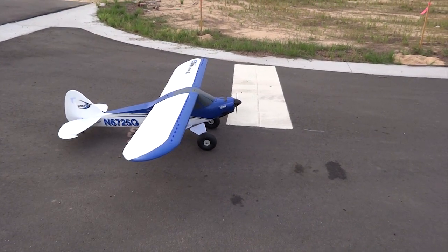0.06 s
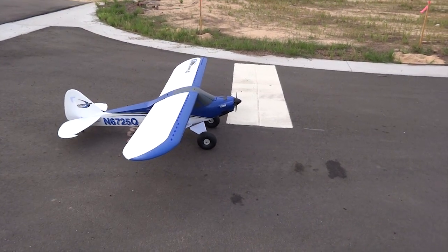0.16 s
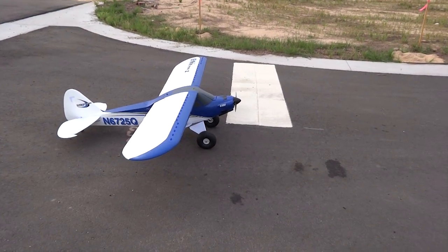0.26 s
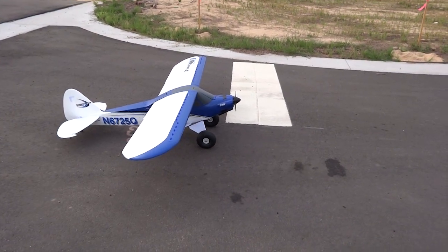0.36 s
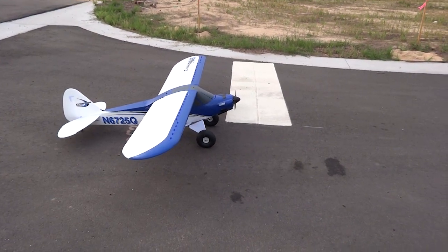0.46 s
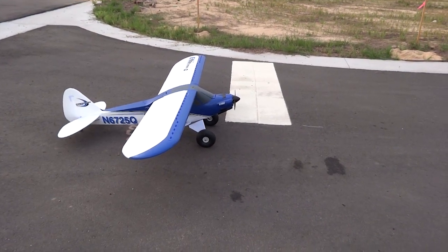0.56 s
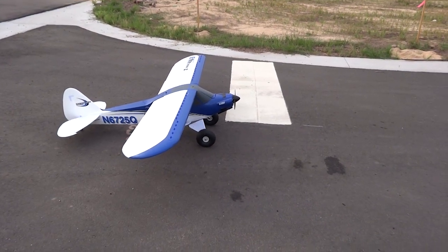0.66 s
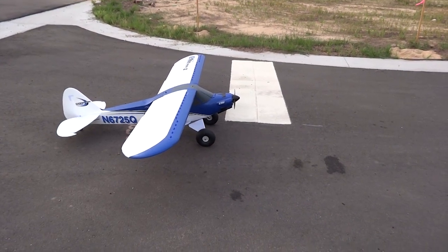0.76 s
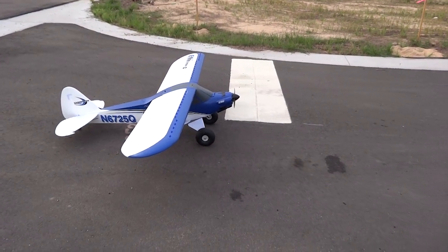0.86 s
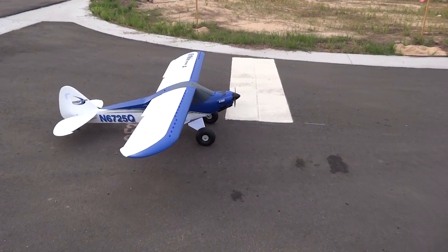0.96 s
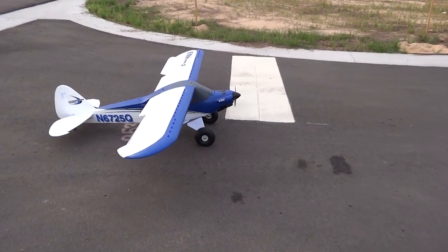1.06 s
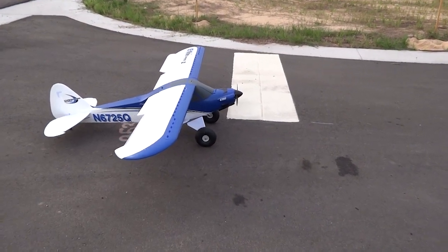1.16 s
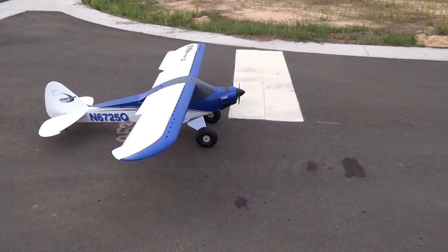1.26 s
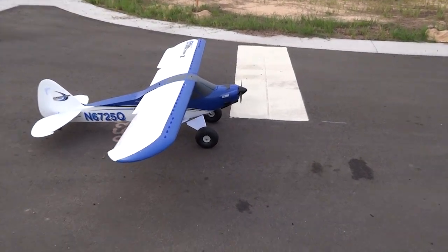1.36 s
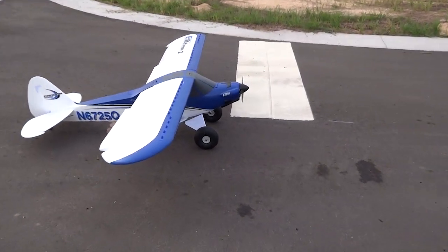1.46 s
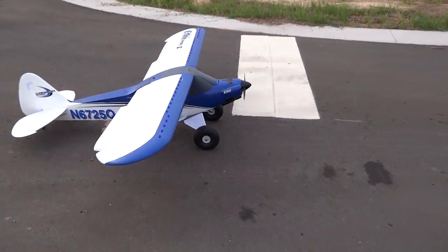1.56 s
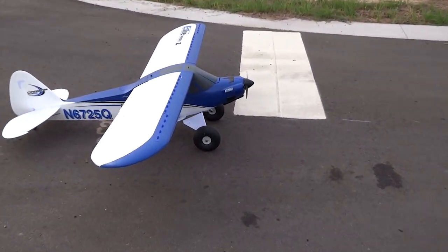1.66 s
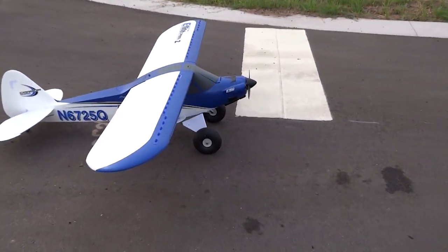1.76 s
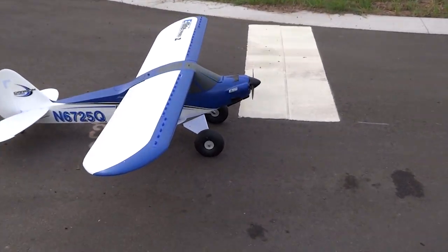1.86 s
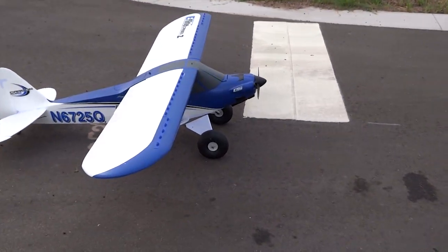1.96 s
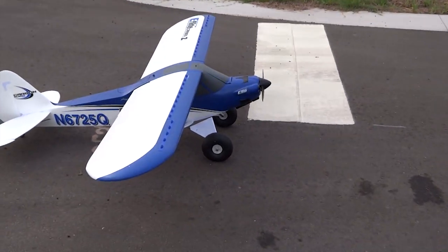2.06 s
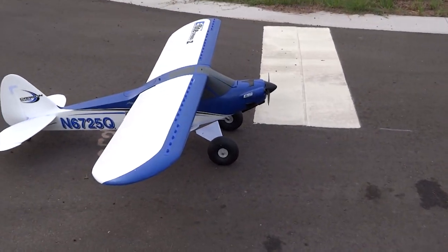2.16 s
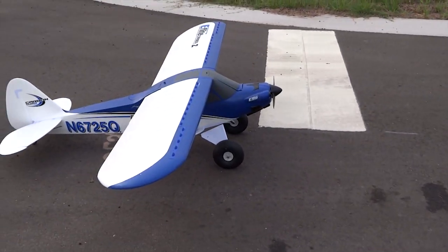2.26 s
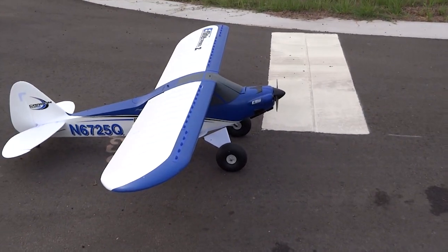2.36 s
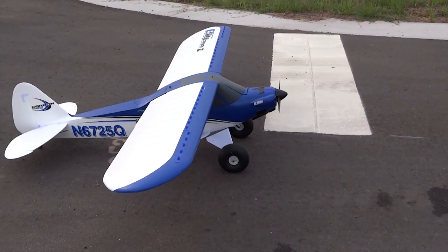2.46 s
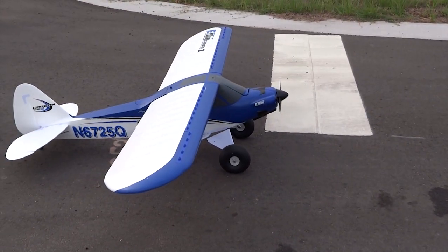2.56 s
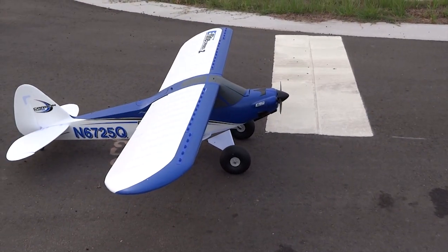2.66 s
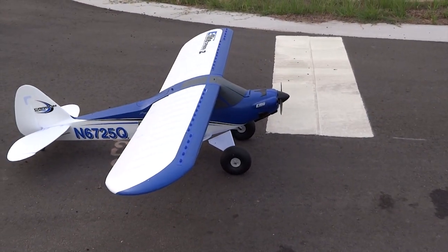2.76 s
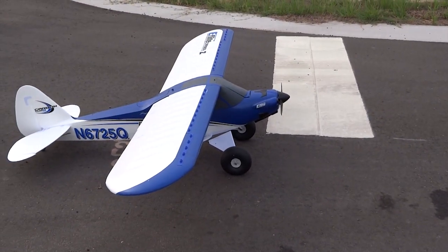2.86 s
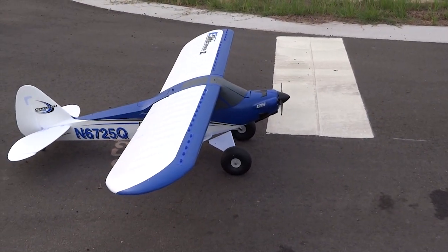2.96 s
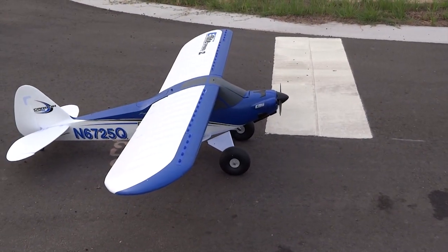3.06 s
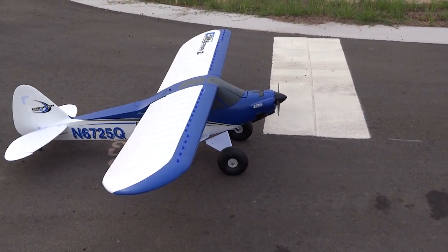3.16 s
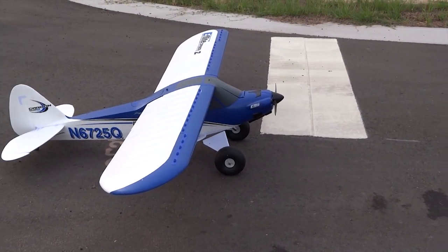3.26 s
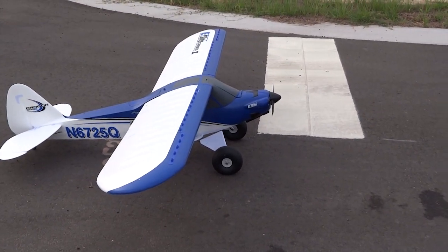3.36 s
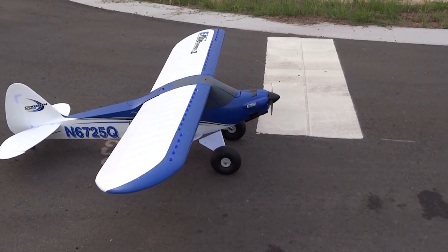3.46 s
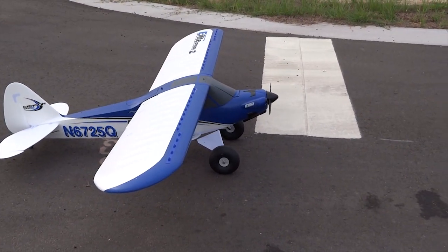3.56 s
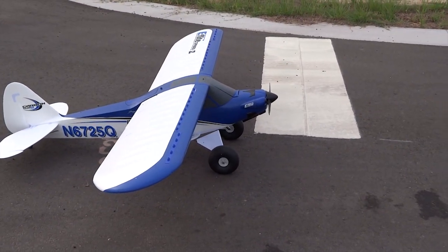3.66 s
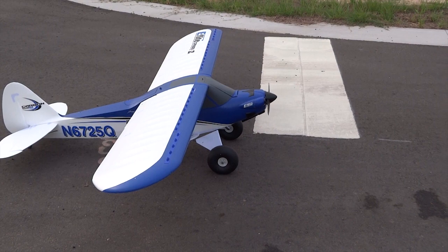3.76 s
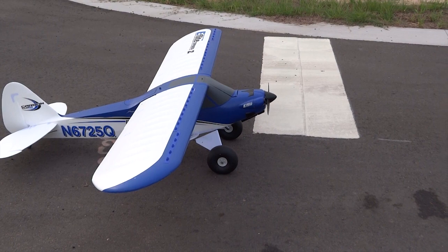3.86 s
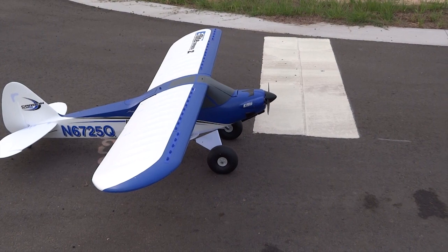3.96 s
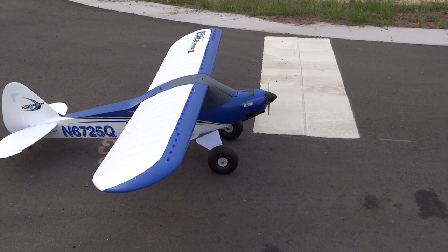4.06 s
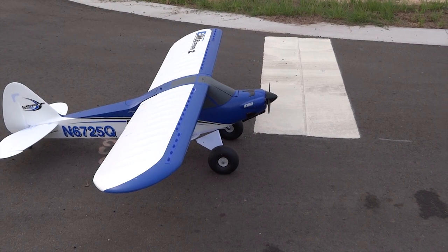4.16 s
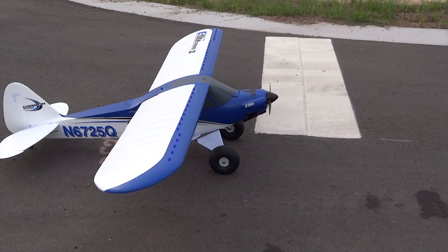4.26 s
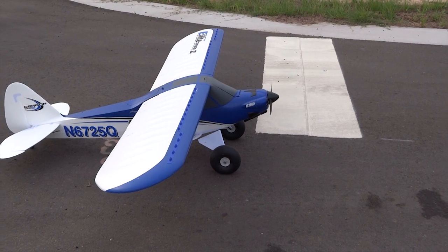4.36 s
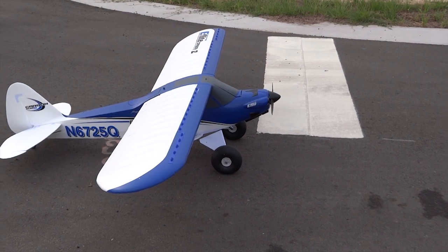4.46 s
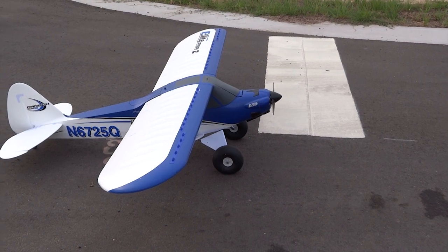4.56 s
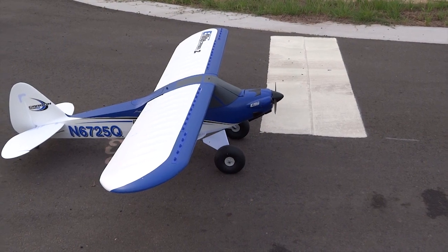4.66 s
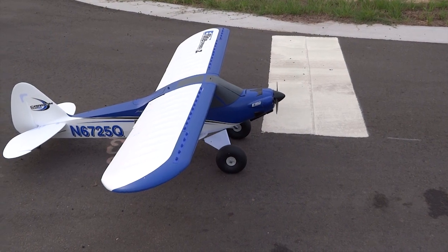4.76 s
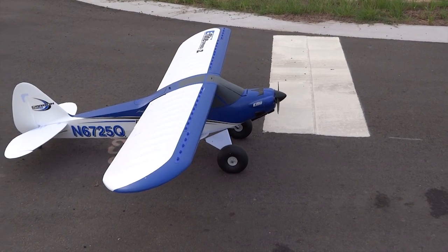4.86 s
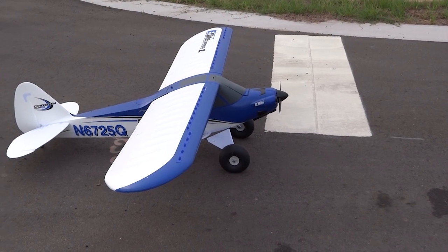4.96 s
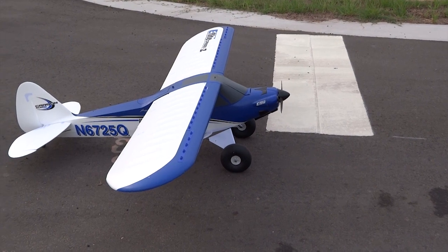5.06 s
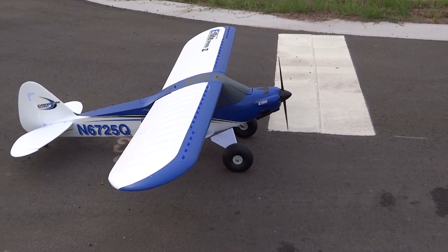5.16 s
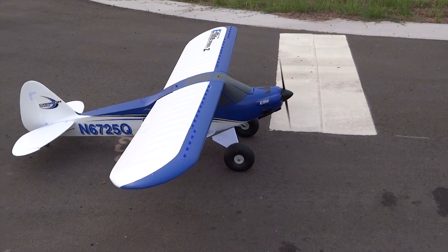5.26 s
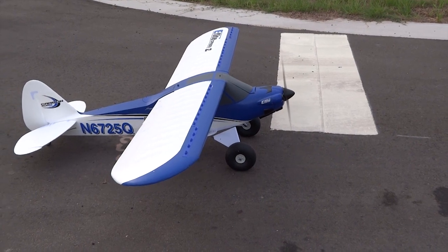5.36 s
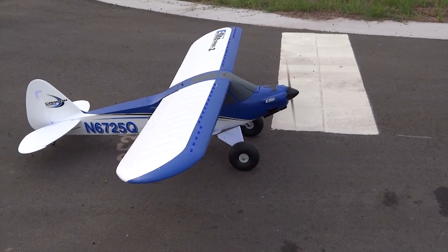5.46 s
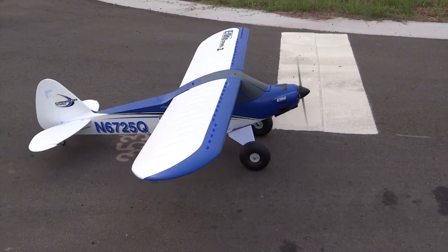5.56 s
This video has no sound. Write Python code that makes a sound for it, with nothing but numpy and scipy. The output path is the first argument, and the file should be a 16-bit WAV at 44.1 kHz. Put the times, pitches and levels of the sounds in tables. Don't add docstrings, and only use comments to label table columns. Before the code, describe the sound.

Small servos whirr back and forth on a model plane outdoors, then hum and tick at rest before an electric motor spools up sharply.

```python
import sys
import numpy as np
from scipy import signal
from scipy.fft import rfft, irfft, next_fast_len
from scipy.io import wavfile
from scipy.ndimage import uniform_filter1d

SR = 44100
rng = np.random.default_rng(int(sys.argv[2]) if len(sys.argv) > 2 else 0)


def undo_db(level):
    steps = np.asarray(level, float) / 20
    return 10 ** steps


def store_pcm(level_fs):
    pcm = np.round(np.clip(level_fs, -1, 1) * 32767).astype(np.int16)
    wavfile.write(sys.argv[1], SR, np.atleast_2d(pcm).T)


N = 248228
FRAME_S, FIRST_FRAME_S = 0.022, 0.021


def rms_one(x):
    return x / np.sqrt(np.mean(x ** 2) + 1e-20)


def in_time(tables, silent_db=-140):
    t = np.arange(N) / SR
    s, *columns = np.transpose(np.vstack(tables))
    columns = [np.interp(t, s, column) for column in columns]
    inside = sum((t >= rows[0][0]) & (t <= rows[-1][0]) for rows in tables)
    return [np.where(inside, columns[0], silent_db)] + columns[1:]


def colour(x, points):
    hz, db = np.transpose(points)
    size = next_fast_len(N, real=True)
    axis = np.arange(size // 2 + 1) * SR / size + 1
    gain = undo_db(np.interp(np.log(axis), np.log(hz), db))
    return irfft(rfft(x, size) * gain, size)[:N]


def band(x, low_hz, high_hz):
    return signal.sosfilt(signal.butter(2, [low_hz, high_hz], "band", fs=SR, output="sos"), x)


def drift(rate_hz):
    sos = signal.butter(2, [rate_hz / 8, rate_hz], "band", fs=SR / 32, output="sos")
    slow = rms_one(signal.sosfilt(sos, rng.standard_normal(N // 32 + 2)))
    return np.interp(np.arange(N) / 32, np.arange(len(slow)), slow)


def body(x, peaks, flat_db, widen, wander_db=0):
    out = undo_db(flat_db) * x
    for k, (hz, width, db) in enumerate(peaks):
        r = np.exp(-np.pi * width * widen / SR)
        level_db = db + (wander_db * drift(11.5) if wander_db else 0)
        zeros = np.array([1, 0, -1]) * (1 - r * r) / 2
        poles = [1, -2 * r * np.cos(2 * np.pi * hz / SR), r * r]
        out = out + (-1) ** k * undo_db(level_db) * signal.lfilter(zeros, poles, x)
    return out


def grains(per_s, spread_db):
    sizes = undo_db(spread_db * np.minimum(rng.exponential(1, N), 4)) * rng.standard_normal(N)
    return sizes * (rng.random(N) < per_s / SR) + 1e-18


def burst(times, peaks_db, t60, hold=0.99):
    kicks = np.full(N, 1e-18)
    kicks[np.round(np.asarray(times) * SR).astype(int)] = undo_db(peaks_db)
    shape = signal.lfilter([1], [1, -undo_db(-60 / (t60 * SR))], kicks)
    return signal.lfilter([1 - hold], [1, -hold], shape) * rng.standard_normal(N)


def glides(tables, orders, wobble_db):
    out, wobble = np.zeros(N), undo_db(wobble_db * drift(21))
    for rows in tables:
        s, hz, db = np.transpose(rows)
        i = np.arange(round(s[0] * SR), min(round(s[-1] * SR), N))
        phase = 2 * np.pi * np.cumsum(np.interp(i / SR, s, hz)) / SR
        tone = sum(undo_db(gain_db) * np.sin(k * phase) for k, gain_db in orders)
        fade = signal.windows.tukey(len(i), min(0.038 * SR / len(i), 1))
        out[i] += np.sqrt(2) * undo_db(np.interp(i / SR, s, db)) * fade * tone
    return out * wobble


# (start [s], fastest [s], end [s], gear rattle [dB], bright share [dB])
STROKES = [(-.4, 0.135, 0.185, -42, -5.5), (0.404, 0.521, 0.63, -40.5, -4.5),
           (0.588, 0.635, 0.66, -47, -5.5), (0.629, 0.785, 0.886, -39.5, -4), (0.867, 0.891, 1.03, -44, -2),
           (0.912, 1.126, 1.19, -41, 1.5), (1.387, 1.578, 1.598, -36, 2), (1.578, 1.626, 1.65, -46.5, 0),
           (1.626, 1.694, 1.768, -36, 1.5), (1.7, 1.775, 1.84, -48.5, -5), (4.776, 4.803, 4.83, -54, -3),
           (4.835, 4.863, 4.893, -54, -2.5)]
# (start [s], end [s], level [dB])
HUNTING = [
    (0.0, 0.428, -62),
    (1.15, 1.43, -63),
    (1.79, 2.06, -63.5),
    (4.758, 4.888, -60.5),
]
# (time [s], extra level [dB])
JOLTS = [(0.575, 6), (0.6843, 3), (0.8555, 4), (0.8859, 1), (1.036, 3.5), (1.08, 4), (1.144, 4.5),
         (1.459, 4.5), (1.5216, 6), (1.6282, 12), (1.6671, -2.5)]


def stroke_levels():
    t = np.arange(N) / SR
    hunt = 1e-7
    for start, end, db in HUNTING:
        hunt = hunt + undo_db(db) * (t >= start) * np.exp(-np.maximum(t - end, 0) / 0.012)
    hunt_shares_db = np.array([0, -4.5, -4])
    power = np.outer(undo_db(2 * hunt_shares_db), hunt ** 2)
    for start, top, end, db, bright_db in STROKES:
        i = np.arange(max(round(start * SR) + 1, 0), round(end * SR))
        rise_or_fall = np.where(t[i] < top, 1.17, 1.7)
        speed = np.sin(np.pi / 2 * np.interp(t[i], [start, top, end], [0, 1, 0])) ** rise_or_fall
        low_db = -7 + 0.95 * bright_db
        shares = [(0, 0), (bright_db, 0.36), (low_db, -0.034)]  # (dB, extra swing with speed)
        power[:, i] += [undo_db(2 * (db + share_db)) * speed ** (2 + 2 * follows) for share_db, follows in shares]
    frame_push = np.sin(2 * np.pi * (t - FIRST_FRAME_S) / FRAME_S)
    push_db = 1.1 * frame_push * np.array([[0.4], [1], [0]])
    jolt_db = sum(db * np.exp(-np.maximum(t - s, 0) / 0.0085) * (t >= s) for s, db in JOLTS)
    return 10 * np.log10(power) + push_db + jolt_db


# (frequency [Hz], density [dB per Hz])
GEARS = [
    [(200, -18.5), (400, -16.5), (950, 4.5), (1100, -4.5), (2100, -0.5), (3400, -2), (4600, -7.5),
     (6000, -9), (9000, -4), (15500, -20.5)],
    [(200, -19.5), (450, -5), (900, 4.5), (1500, -6.5), (3300, -3), (4600, -8), (7000, -10), (9200, -8.5),
     (12000, -9.5), (15500, -15.5)],
]
# (frequency [Hz], width [Hz])
CASE = [
    [(1180, 64), (1590, 125), (2020, 47), (2440, 55), (2750, 38), (3110, 230), (3640, 51), (4100, 72),
     (5830, 170), (7900, 19), (8850, 32)],
    [(760, 52), (1200, 190), (1540, 59), (2100, 80), (2700, 34), (2990, 120), (3280, 86), (3630, 150),
     (4120, 18), (4850, 87), (5880, 68), (8870, 45), (9390, 1200)],
]


def servo_strokes():
    t = np.arange(N) / SR
    rattle_db, bright_db, low_db = stroke_levels()
    clicks = grains(14000, spread_db=1.5) * undo_db(0.65 * drift(96))
    servos = []
    for case, gears in zip(CASE, GEARS):
        modes = [(hz, width, 0) for hz, width in case]
        servos.append(colour(body(clicks, modes, flat_db=-7.5, widen=0.66, wander_db=2.5), gears))
    first_moves = (t < 1.0) | (t > 4.7)
    parts = []
    for low_hz, high_hz in [(280, 898), (900, 8630), (5500, 22000)]:
        first, second = [rms_one(band(servo, low_hz, high_hz)) for servo in servos]
        parts.append(np.where(first_moves, first, second) * undo_db(0.84 * drift(93)))
    low, middle, bright = parts
    return undo_db(low_db + 5.0) * low + undo_db(rattle_db + 7.0) * middle + undo_db(bright_db + 6.5) * bright


# (start [s], length [s], top pitch [Hz], level [dB], octave level [dB])
WHINE = [
    (0.0, 0.13, 267.3, -68.5, 1),
    (0.455, 0.13, 360.4, -59, -4),
    (0.713, 0.09, 400.5, -61.5, 1),
    (1.032, 0.15, 417, -61, -6),
    (1.42, .17, 444, -49, 6),
    (1.668, 0.058, 773, -42, 10),
]
WHINE_ENDS = [(1.135, 0.93), (0.73, 0.66), (1, 0.95), (1.2, 1.06), (0.32, 0.937), (0.71, 0.84)]


def rotor_whine():
    u = np.linspace(0, 1, num=7)
    out = np.zeros(N)
    for (s, length, top_hz, db, octave_db), (first, last) in zip(WHINE, WHINE_ENDS):
        rising = (1 - first) * (1 - u / 0.55) ** 2
        falling = (1 - last) * ((u - 0.55) / 0.45) ** 2
        share = 1 - np.where(u < 0.55, rising, falling)
        glide = np.transpose([s + length * u, top_hz * share, db - 60 * (1 - share)])
        orders = [(1, 0.5), (2, octave_db), (3, -3.0), (4, 2.5), (5, -6), (6, -3.5), (7, -18), (8, -6)]
        out += glides([glide], orders, wobble_db=1.5)
    return out


# (time [s], third harmonic [dB], fourth [dB], fifth [dB])
HOLD = [(0.0, -53, -68, -65), (0.215, -60, -55.5, -62), (0.285, -62, -56.5, -68.5), (0.351, -63, -55, -64),
        (1.187, -57.5, -65, -63), (1.231, -53, -64, -71), (1.275, -56.5, -58.5, -71),
        (1.341, -68, -69, -81), (1.824, -57, -53.5, -68), (1.891, -62, -61.5, -68),
        (1.979, -63, -60, -75.0), (2.045, -69, -55, -77), (2.089, -63.5, -56, -65), (2.155, -64, -58, -62),
        (2.199, -63, -65, -64), (2.265, -65, -60.5, -64), (2.353, -68.5, -56, -64),
        (2.419, -60, -54, -61.5), (2.463, -70, -54.5, -64), (2.507, -60.5, -55, -63),
        (2.617, -56.5, -56, -62), (2.661, -58.5, -51.5, -58.5), (2.749, -64, -53, -58.5),
        (2.793, -64, -57.5, -62), (2.837, -62, -59, -59), (2.881, -55.5, -53.5, -59),
        (3.145, -59.5, -53, -58.5), (3.321, -63, -55, -61), (3.365, -57.5, -58, -61),
        (3.409, -58.5, -53.5, -60), (3.849, -54.5, -54.5, -59), (3.893, -60, -54.5, -61.5),
        (4.091, -60.5, -51.5, -60), (4.223, -62, -54.5, -63), (4.289, -57.5, -57, -59.5),
        (4.333, -56.5, -53, -60.5), (4.377, -58, -51.5, -60.5), (4.531, -62, -54.5, -65),
        (4.597, -57.5, -52.5, -66), (4.641, -56.5, -53.5, -57.5), (4.707, -60, -59, -58.5),
        (4.773, -76, -65, -70), (4.817, -63, -59, -70), (4.861, -71, -61, -61), (4.905, -60, -60, -69),
        (4.971, -64.5, -62.5, -66.5), (5.103, -60, -59.5, -71.5), (5.169, -60, -70, -65),
        (5.24, -77, -79, -81)]
# (multiple [1], level beside the third for multiples below 3, the fifth for the sixth, the
# eleventh from the seventh up [dB])
OVERTONES = [(1, -19.5), (2, -20.5), (6, -15), (7, 2.5), (8, -1.5), (9, -6), (10, -1), (12, -7), (13, -9.5),
             (14, -19), (15, -20)]
# (time [s], extra level [dB])
SEVENTH = [(2.0, -2.5), (2.45, 6.5), (3.2, 2.5), (4.0, -1), (4.9, 2), (4.97, 3), (5.2, -11)]
SLIPS_S = [2.661, 3.035, 3.409, 3.453, 3.497, 3.541, 3.585, 3.629, 3.673]


def servo_buzz():
    t = np.arange(N) / SR
    frame = (np.maximum(t - FIRST_FRAME_S + FRAME_S, 0) // FRAME_S).astype(int)
    draws = rng.standard_normal((frame[-1] + 1, 16))
    steps = signal.lfilter([0.75], [1, -0.65], draws, axis=0)[frame].T
    phase = 2 * np.pi * np.cumsum(834.7 + 0.7 * drift(4)) / SR
    restarts = np.cumsum(0.25 * draws[:, 0] * (draws[:, 15] > 0))
    seeking = restarts[np.minimum(frame, int(2.1 / FRAME_S))]
    slips = -1 / 12 * np.searchsorted(SLIPS_S, t)
    phase += 2 * np.pi * uniform_filter1d(slips + seeking, size=220)
    rows = np.array(HOLD)
    held = rows[np.searchsorted(rows[:, 0], t, "right") - 1, 1:].T
    third, fourth, fifth = uniform_filter1d(held, size=150)
    high = -73 + 0.36 * ((third + fourth) / 2 + 58)
    strong = {3: third, 4: fourth, 5: fifth, 11: high}
    weak = {k: db + (third if k < 3 else fifth if k < 7 else high) for k, db in OVERTONES}
    weak[2] = weak[2] + 10.5 * (t > 4.76)
    weak[7] = weak[7] + np.interp(t, *np.transpose(SEVENTH))
    out = 0
    for k, db in {**strong, **weak}.items():
        spread_db = 0.7 if k in (3, 4, 5) else 3.2
        level_db = db + uniform_filter1d(spread_db * steps[int(k)], size=150)
        out = out + undo_db(level_db) * np.sin(k * phase + k * k)
    moving = np.clip((stroke_levels()[0] + 58) / 10, 0, 1)
    return np.sqrt(2) * out * undo_db(-4 * moving)


# (time [s], peak [dB], bright share [dB])
TWITCH = [(0.238, -46.5, 0), (0.279, -35.5, -3.5), (0.312, -43, -7), (0.349, -38.5, -6), (0.372, -39.5, 2),
          (0.397, -41, 2), (1.369, -45, -9), (1.392, -41.5, -2), (2.153, -41.5, -10.5), (4.751, -48, 3),
          (4.775, -41.5, 2), (4.818, -36, -7)]
# (time [s], peak [dB])
TICKS = [(2.1964, -58), (2.2433, -50), (2.3735, -49), (2.4833, -47), (2.5935, -64), (2.6155, -55),
         (2.6609, -55), (2.7247, -54), (2.7482, -57), (2.794, -55), (2.9013, -51), (2.9243, -63),
         (3.0116, -53), (3.0779, -49), (2.858, -58), (2.879, -57), (2.968, -57), (3.189, -57),
         (3.1433, -53), (3.253, -49), (3.3199, -58), (3.4072, -51), (3.4521, -53), (3.6267, -62),
         (3.674, -49.5), (3.565, -52), (3.695, -56.5), (3.7599, -64), (3.871, -58), (3.893, -63),
         (3.937, -59), (4.025, -63), (4.091, -65), (4.0462, -65), (4.1121, -63), (4.2223, -73),
         (4.2832, -63), (4.3989, -56), (4.4638, -51), (4.531, -51), (4.575, -50)]
# (time [s], dry level [dB], ringing level [dB])
CRACKLE = [(2.5135, -38, -70), (2.542, -37, -70), (2.548, -35.5, -70), (2.5545, -44, -73),
           (4.752, -45, -35), (4.7725, -41, -35), (4.8176, -40, -28), (4.859, -35, -36)]


def twitches():
    s, peak_db, bright_db = np.transpose(TWITCH)
    jerks = band(burst(s, peak_db + 7.5, t60=0.063), 2900, 3500)
    jerks += band(burst(s, peak_db - 12.5, t60=0.083), 1100, 1800)
    jerks += band(burst(s, peak_db + bright_db + 3.5, t60=0.032, hold=1.0), 3000, 12400) 
    frames = np.arange(FIRST_FRAME_S, 5.2, FRAME_S)
    uneven_db = 3.5 * rng.standard_normal(len(frames))
    s, peak_db = np.transpose(TICKS)
    ticks = burst(frames, uneven_db - 52, t60=0.011) + burst(s, np.maximum(peak_db, -62) + 16, t60=0.016)
    s, dry_db, ring_db = np.transpose(CRACKLE)
    crackle = band(band(burst(s, dry_db + 1, t60=0.025, hold=0.96), 900, 5000), 900, 5500)
    struck = band(burst(s, ring_db, t60=0.025, hold=0.87), 2700, 14000)
    crackle += body(struck, [(3300, 250, 6.8), (9200, 270, 6.9)], flat_db=-7.5, widen=0.66)
    return jerks + crackle + band(ticks, 2600, 3570) + undo_db(-29.0) * band(ticks, 6200, 18000)


# (frequency [Hz], width [Hz], gain [dB])
GAPS = [(820, 43, -10), (1117, 29, -4), (1360, 57, 1), (1960, 74, -8), (2900, 36, 9), (3660, 99, -6),
        (4160, 120, -12)]


def gap_db(hz):
    return sum(db * np.exp(-((hz - gap_hz) / width) ** 2) for gap_hz, width, db in GAPS)


def motor_levels(hz):
    decades = np.log10(np.maximum(hz, 1) / 1000)
    whine_db = -25.5 + 14 * decades - 9 / (1 + np.exp((2600 - hz) / 80))
    hiss_db = -36.5 + 11.5 * decades + 6 / (1 + np.exp((2260 - hz) / 41))
    return whine_db, -81 + 21.5 * hz / 1000, hiss_db


# (time [s], commutation rate [Hz], magnetic pull [dB])
SPEED = [(5.214, 60, 0.1), (5.26, 155, 0.1), (5.32, 295, 2.5), (5.35, 480, 3), (5.418, 1010, 3),
         (5.46, 1310, 1.5), (5.505, 1700, 2.5), (5.58, 2520, 1.5), (5.63, 2880, 0.1)]
# (time [s], level [dB])
TORQUE = [(5.214, -49.5), (5.257, -26), (5.3, -21), (5.43, -24.5), (5.501, -21), (5.541, -19.5),
          (5.574, -31), (5.63, -22.5)]
# (time [s], level [dB])
SWITCHING = [
    (5.21, -48),
    (5.4, -37),
    (5.5, -34),
]
# (multiple of commutation [1], level [dB], fades above [Hz])
WHINE_ORDERS = [(1, 0, 2550), (2, 2, 5600), (3, 3, 2600), (4, -1, 1300), (5, -7, 1400)]
# (multiple of blade rate [1], level [dB])
BLADE_ORDERS = [(1, -17), (2, -7), (3, -6.5), (4, 0), (5, -9.5), (7, -20), (9, -9), (12, -27)]
# (frequency [Hz], density [dB per Hz])
BLADE_HISS = [(410, -38), (700, -36), (1690, 12.5), (2010, -7), (2530, 8.5), (6630, -3.5), (11700, -1.5),
              (15600, 1)]
# (frequency [Hz], gain [dB])
NOSE = [(100, -1), (210, 8.5), (270, -2.5), (400, -0.5), (540, 2), (615, 16), (660, -2), (1200, 4)]
# (frequency [Hz], width [Hz], level [dB])
AIRFRAME = [(237, 100, -16.5), (570, 39, -2.5), (924, 64, 2.5), (1025, 37, 4), (1206, 59, -1),
            (1472, 48, 0), (1697, 35, 3), (2120, 94, -2), (2416, 120, -3.5), (2596, 64, 0),
            (3050, 170, -11), (3510, 55, -6), (3970, 27, -15), (4440, 38, -9.5), (4800, 160, -30)]
# (frequency [Hz], width [Hz], level [dB])
MOUNT = [(4000, 60, -5), (4650, 60, 0), (5100, 70, -4)]


def motor():
    t = np.arange(N) / SR
    steps_per_blade = 21
    s, torque_db = np.transpose(TORQUE)
    started = t > s[0]
    rattle_db = np.interp(t, s, torque_db)
    hz, pull_db = in_time([SPEED], silent_db=0)
    whine_db, beat_db, hiss_db = motor_levels(hz)
    phase = 2 * np.pi * np.cumsum(hz * (1 + 0.0081 * drift(150))) / SR
    turn = phase / steps_per_blade / 2
    since_kick = phase / (2 * np.pi) % 1

    whine = 0
    for k, db, fade_hz in WHINE_ORDERS:
        level_db = db + pull_db + gap_db(k * hz) + 1.26 * drift(98)
        whine = whine + undo_db(level_db) * np.sin(k * phase) / (1 + (k * hz / fade_hz) ** 10)
    uneven = 1 + 0.013 * np.cos(turn) + 0.055 * np.cos(2 * turn + 1) + 0.044 * np.cos(7 * turn)
    whine = band(whine * uneven * undo_db(whine_db + 8), 400, 9000)
    whine = body(whine, AIRFRAME[:12] + MOUNT, flat_db=-24, widen=1.2)

    shaken = grains(7000, spread_db=2.0) * undo_db(-14 * since_kick) * undo_db(rattle_db) * started
    rattle = undo_db(23.5) * body(band(shaken, 200, 3500), AIRFRAME, flat_db=-26.0, widen=1.18)

    beat = 0
    for k, db in BLADE_ORDERS:
        nose_db = np.interp(k * hz / steps_per_blade, *np.transpose(NOSE))
        beat = beat + undo_db(db + 2 * drift(40) + nose_db) * np.sin(2 * k * turn + k * k)
    beat = beat * undo_db(beat_db)

    puff_db = (-3 - 20 * since_kick) * (hz < 125)
    hiss = rms_one(colour(rng.standard_normal(N), BLADE_HISS))
    hiss = hiss * undo_db(hiss_db + 7.5 + puff_db) * (1 + 0.14 * np.cos(2 * turn))

    tone = glides([[(s, 7812, db) for s, db in SWITCHING]], [(1, 0), (2, -7)], wobble_db=2.0)
    chopper = tone * np.clip(6 * (1 - since_kick), 0.3, 1)
    return band(whine + rattle + (beat + hiss) * started, 130, 12200) + chopper


# (time [s], low mode [dB], middle modes [dB], high modes [dB])
SNAPS = [
    (0.095, -29, -32, -47),
    (0.909, -31, -62, -52),
    (1.8156, -57, -36, -32),
    (2.057, -33, -32, -37),
    (2.4325, -36.5, -67, -19.5),
]
# (frequency [Hz], decay time t60 [s])
SNAP_MODES = [
    [(1100, 0.011)],
    [(1750, 0.0096), (2550, 0.009)],
    [(3400, 0.0046), (4600, 0.0033), (6200, 0.0024), (13000, 0.0021)],
]


def snaps():
    rise_s = 0.0006
    out = np.zeros(N)
    t = np.arange(round(0.03 * SR)) / SR
    groups = []
    for group in SNAP_MODES:
        ringing = sum(np.sin(2 * np.pi * hz * t) * undo_db(-60 * t / t60) for hz, t60 in group)
        groups.append(ringing * 1.8 * (1 - np.exp(-t / rise_s)))
    for s, *levels_db in SNAPS:
        out[round((s - rise_s) * SR):][:len(t)] += undo_db(np.array(levels_db)) @ groups
    out = band(out, 770, 11000)
    return out + 0.18 * band(np.roll(out, round(0.0045 * SR)), 470, 3500)


# (start [s], length [s], first pitch [Hz], last pitch [Hz], level [dB])
SQUEAK = [
    [(1.74, .085, 12900, 13350, -64), (1.82, .07, 13650, 14300, -69), (1.84, .06, 12250, 12800, -66),
     (1.865, .055, 11850, 12800, -63), (1.9, .05, 12800, 12750, -54), (1.975, .075, 13150, 13000, -66),
     (2.03, .095, 13200, 12200, -63), (1.96, .1, 12500, 12200, -67), (2.055, .035, 11000, 10300, -69),
     (2.14, .03, 12900, 12250, -70)],
    [(4.335, .025, 12450, 13200, -72), (4.38, .1, 11800, 11900, -68), (4.4, .07, 12100, 11300, -64),
     (4.395, .07, 10200, 10700, -75)],
]
BOW_HZ_PER_S = [1600, 13000]
# (start [s], loudest [s], end [s], first level [dB], top level [dB])
DRIVE = [
    (1.715, 1.916, 2.33, -68, -53),
    (4.3, 4.44, 7, -94, -65.5),
]


def lens_drive():
    runs = [[(start, first_db), (top, db), (end, db - 29)] for start, top, end, first_db, db in DRIVE]
    hiss = undo_db(in_time(runs)[0] - 6.5) * rms_one(band(grains(20000, spread_db=5.0), 11400, 13400))
    u = np.linspace(0, 1, num=7)
    arcs = []
    for rows, bow in zip(SQUEAK, BOW_HZ_PER_S):
        for s, length, first, last, db in rows:
            hz = first + (last - first) * u + bow * length * np.sin(np.pi * u)
            arcs.append(np.transpose([s + length * u, hz, db + 0 * u]))
    return glides(arcs, [(1, 0)], wobble_db=3.0) + hiss


# (start [s], length [s], first pitch [Hz], last pitch [Hz], level [dB])
BIRD = [
    (2.16, .16, 1730, 2900, -63),
    (2.775, .18, 3400, 1850, -62),
    (3.3, .165, 3410, 1930, -61),
    (3.78, .175, 3500, 1930, -63),
    (4.24, .17, 3400, 1930, -65),
]
# (share of length [1], share of slide [1], level [dB])
SLIDE = [(0, 0, -9), (.53, .47, -3), (.7, .53, 0), (.83, .83, -3), (1, 1, -7)]


def bird():
    u, slid, shape_db = np.transpose(SLIDE)
    calls = []
    for s, length, first, last, db in BIRD:
        hz = first * (last / first) ** (slid if last < first else u)
        calls.append(np.transpose([s + length * u, hz, db + shape_db]))
    direct = glides(calls, [(1, 0)], wobble_db=1.5)
    echoes = rng.standard_normal(9000) * undo_db(-30 * np.arange(9000) / 9000)
    echoed = signal.fftconvolve(direct, echoes / np.linalg.norm(echoes))[:N]
    return undo_db(-0.3) * (direct + undo_db(-6.0) * echoed)


# (frequency [Hz], density [dB per Hz])
AIR = [(20, -43), (45, -10.5), (100, 2), (180, -1.5), (280, -11.5), (420, -19.5), (800, -12.5),
       (1600, -16.5), (3000, -18.5), (5000, -25.5), (9500, -25), (15600, -30), (17000, -44)]
# (frequency [Hz], side minus middle [dB])
AIR_WIDTH = [(25, -8), (60, -25), (150, -20), (500, 2), (1500, -0.5), (5000, 1), (15000, -17)]
# (time [s], level [dB])
TRAFFIC = [
    (2.1, -65),
    (3.15, -86),
    (3.5, -64),
    (3.72, -66),
    (4.32, -70),
    (4.75, -70),
]


def air():
    middle, side = [undo_db(-64 + 0.066 * drift(2.3)) * rms_one(colour(rng.standard_normal(N), AIR))
                    for _ in range(2)]
    tyres = [(764, 230, -0.64), (1470, 120, -0.25), (2110, 2400, 1.8)]
    car = body(band(rng.standard_normal(N), 390, 3500), tyres, flat_db=-13.0, widen=1.0)
    car_db = in_time([TRAFFIC])[0] + 2.0 + 2.7 * drift(17)
    return middle + undo_db(car_db) * rms_one(car), colour(side, AIR_WIDTH)


# (frequency [Hz], side minus middle [dB])
WIDTH = [(60, -24), (180, -32), (550, -29), (1650, -25), (4970, -21), (7500, -33), (15000, -50)]


def scene():
    hush, side = air()
    snap = snaps()
    late = np.arange(N) > 2 * SR
    side = side - 0.5 * np.roll(snap, 9) * late
    servos = servo_strokes() + rotor_whine() + servo_buzz() + twitches()
    near = servos + motor() + snap + lens_drive() + bird()
    smear = rng.standard_normal(2500) * undo_db(-60 * np.arange(2500) / 3500)
    smeared = signal.fftconvolve(near, smear / np.linalg.norm(smear))[:N]
    side = side + colour(smeared, WIDTH) - 0.0033 * band(near, 200, 5600)
    return np.array([near + hush + side, near + hush - side])


def top_cut(x):
    return signal.sosfilt(signal.butter(12, 15780, fs=SR, output="sos"), x)


def record(dry):
    rounded = 0.55 * np.tanh(dry / 0.55)
    high_pass = signal.butter(2, 150, "high", fs=SR, output="sos")
    rounded = dry + signal.sosfilt(high_pass, rounded - dry)
    cut = signal.sosfilt(signal.cheby2(10, 40, 15900, fs=SR, output="sos"), rounded)
    return top_cut(cut)


dry = scene()
out = record(dry)
store_pcm(out)
```